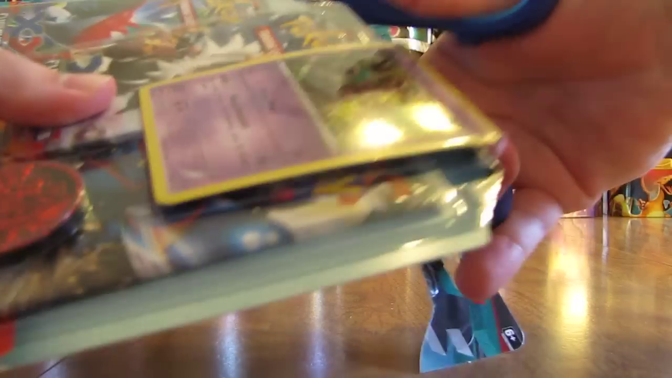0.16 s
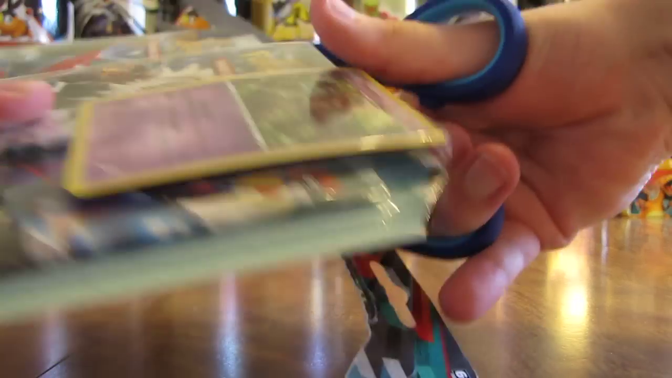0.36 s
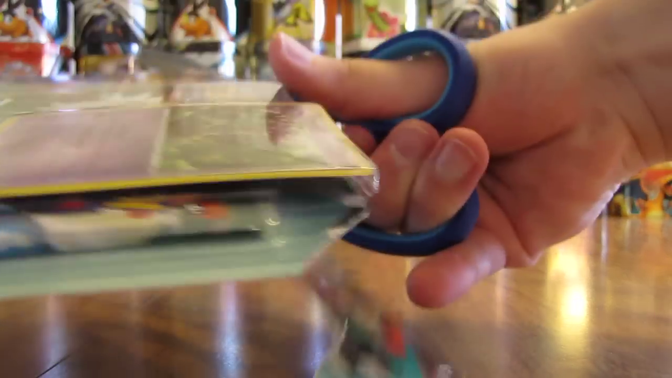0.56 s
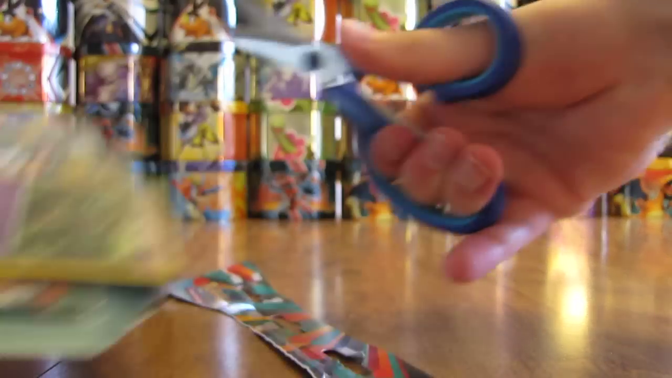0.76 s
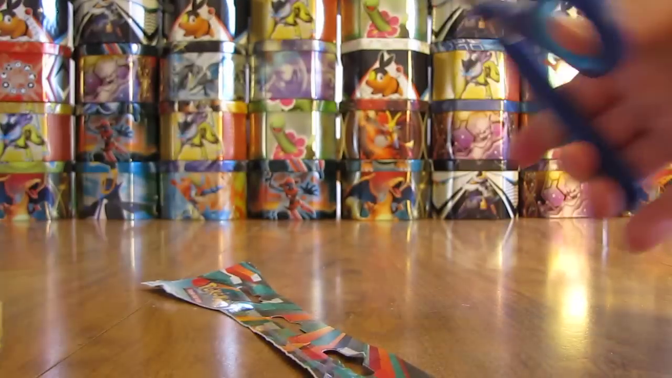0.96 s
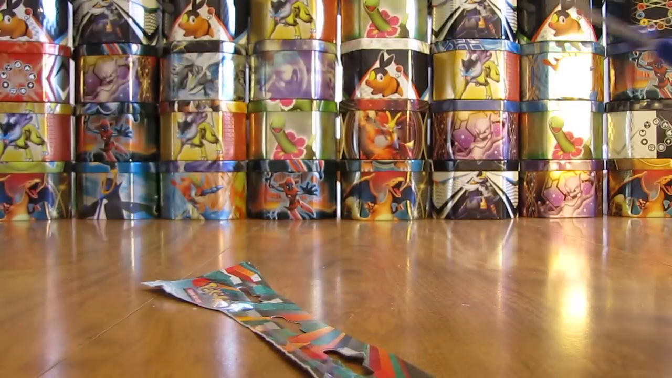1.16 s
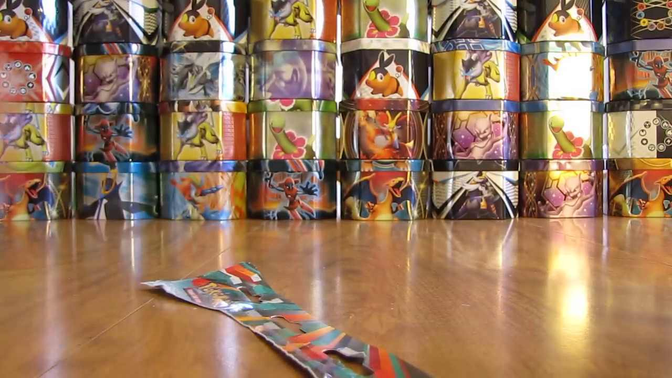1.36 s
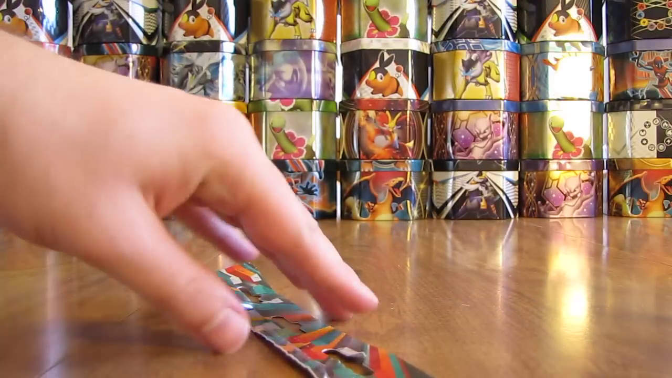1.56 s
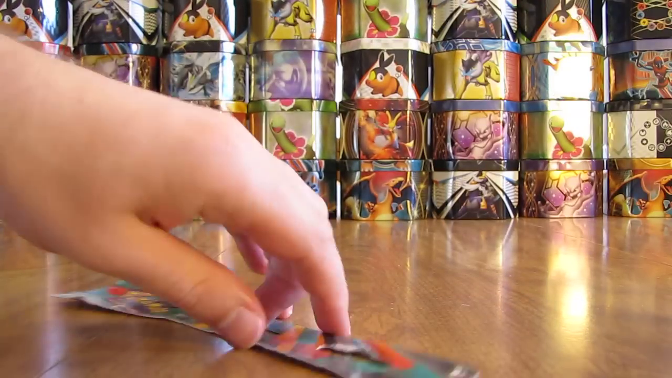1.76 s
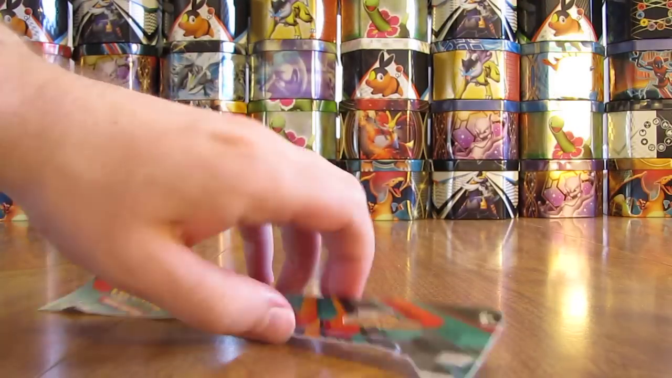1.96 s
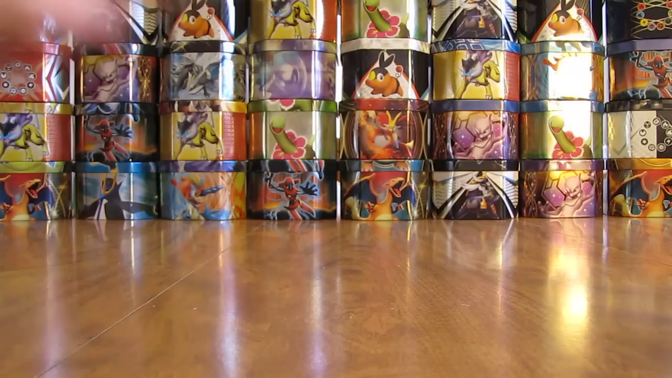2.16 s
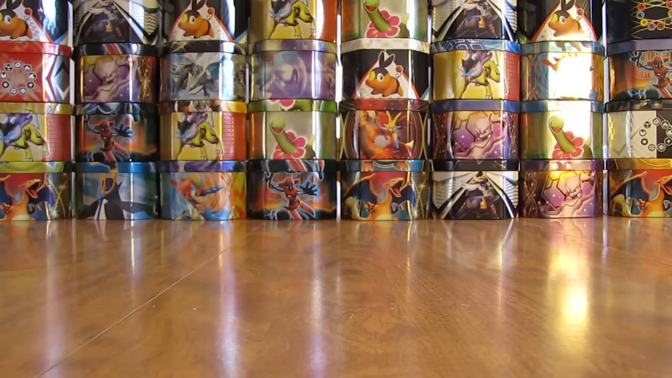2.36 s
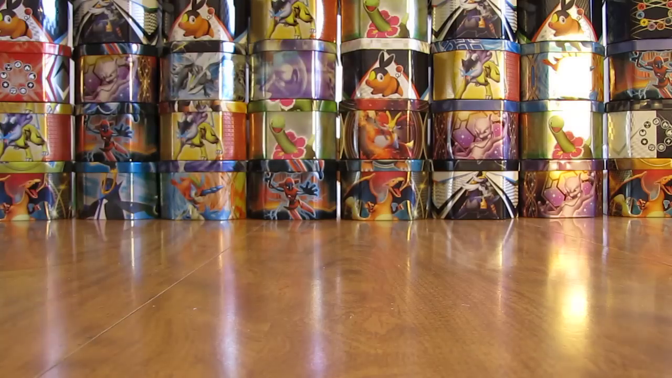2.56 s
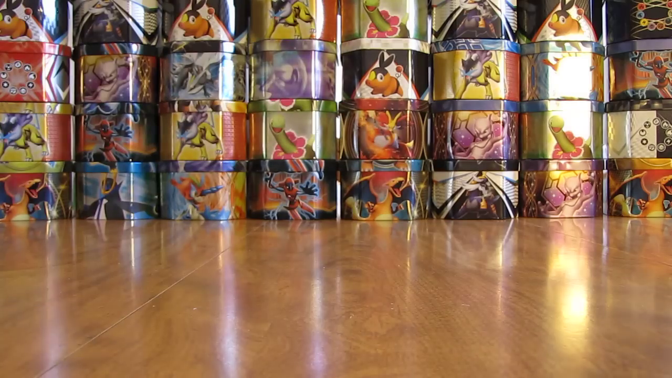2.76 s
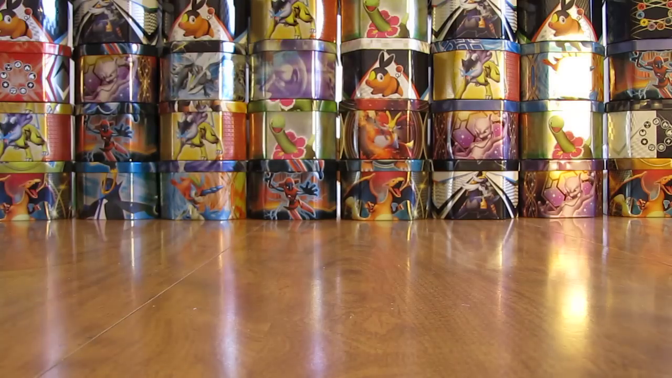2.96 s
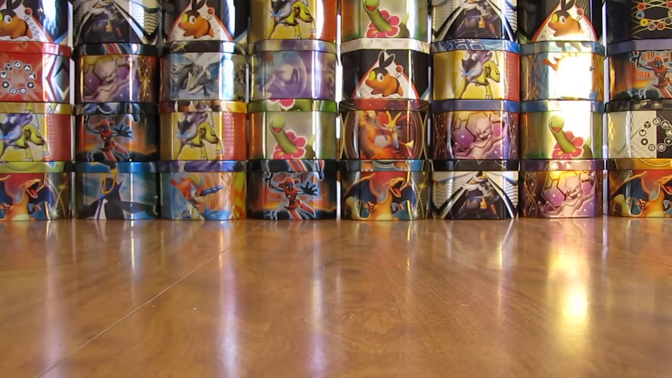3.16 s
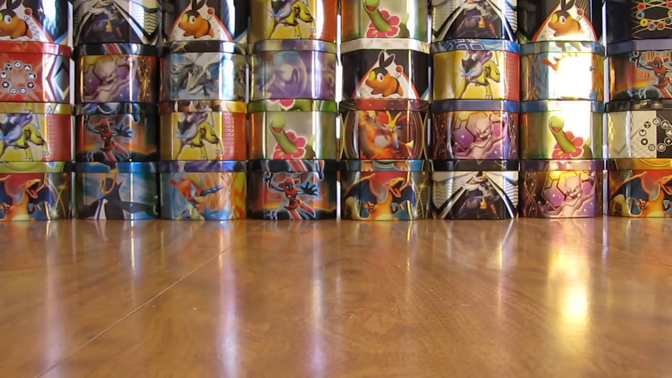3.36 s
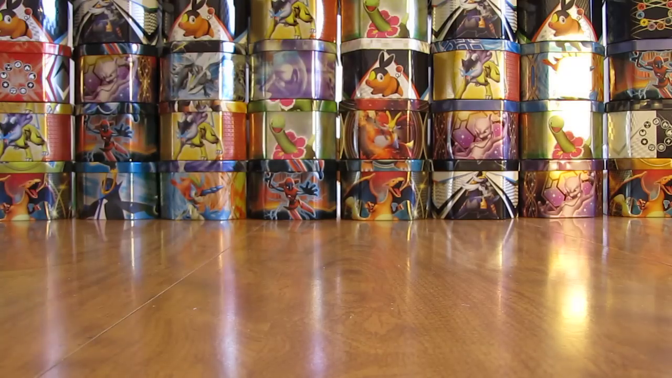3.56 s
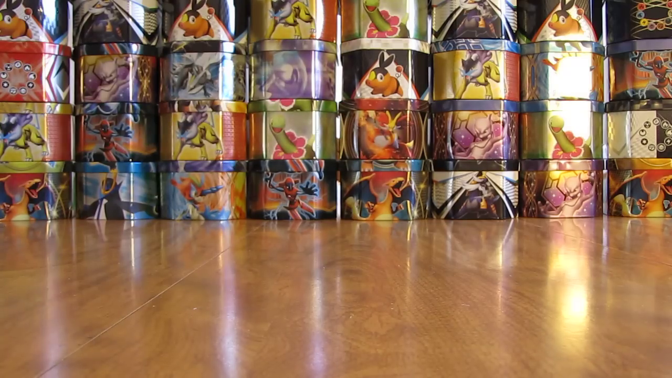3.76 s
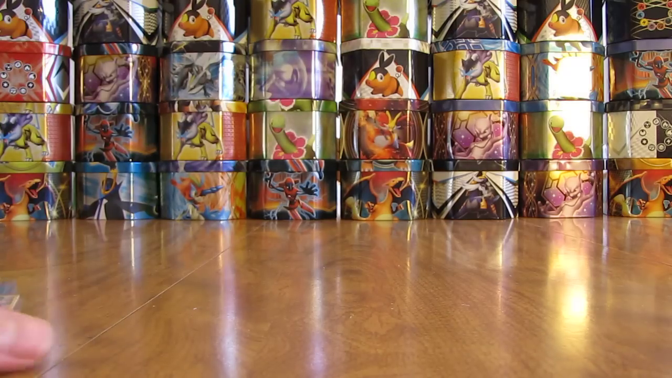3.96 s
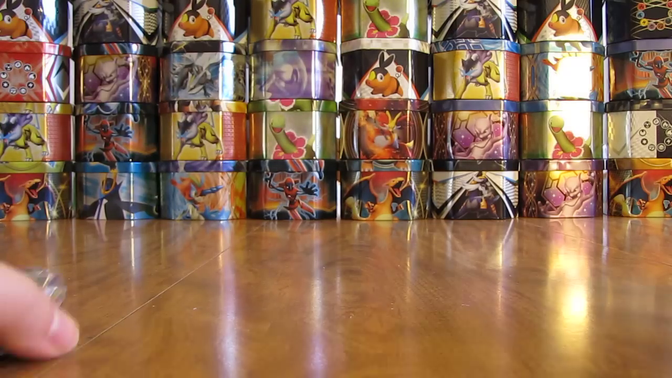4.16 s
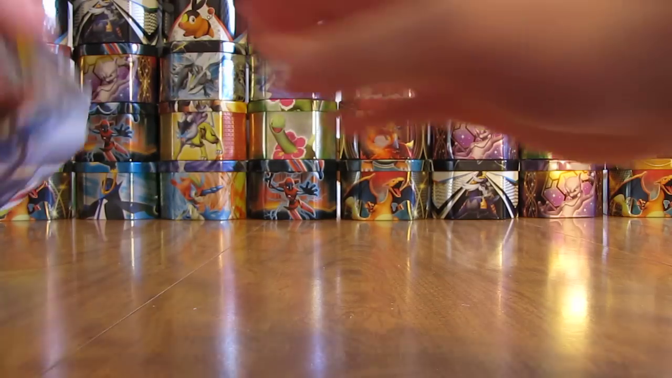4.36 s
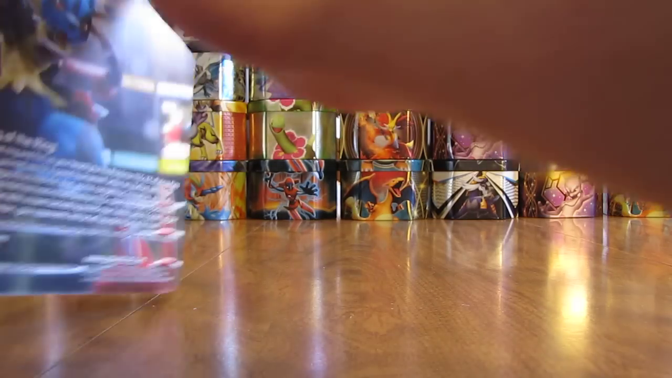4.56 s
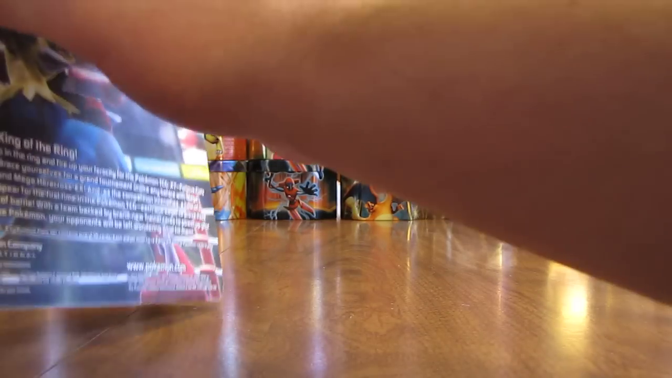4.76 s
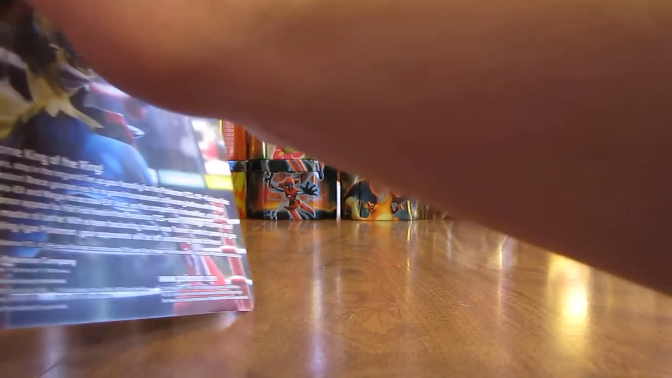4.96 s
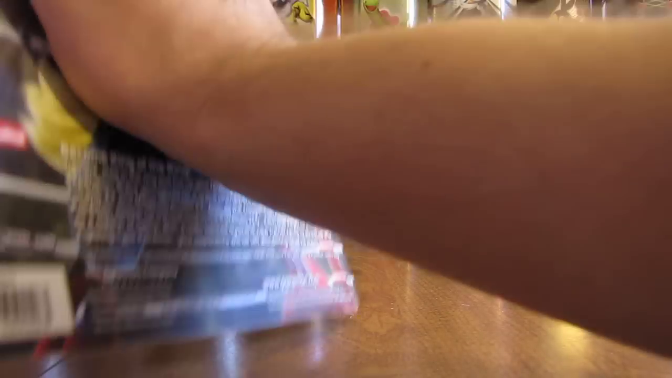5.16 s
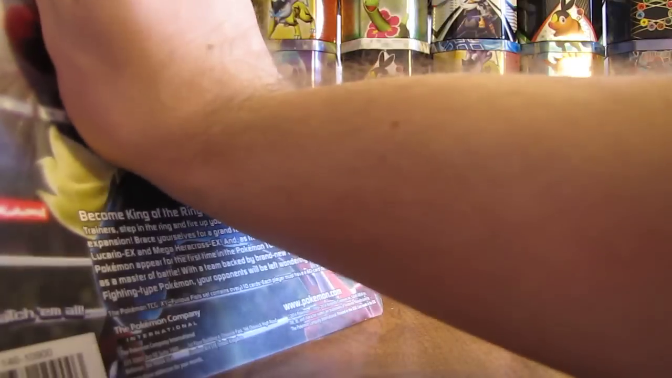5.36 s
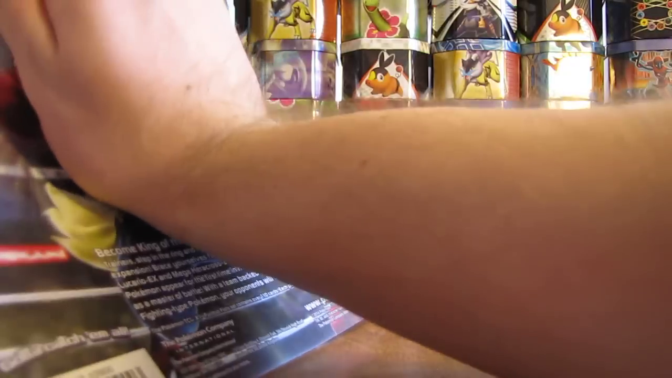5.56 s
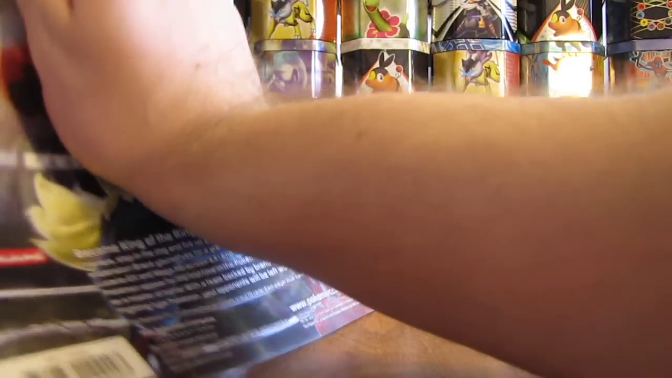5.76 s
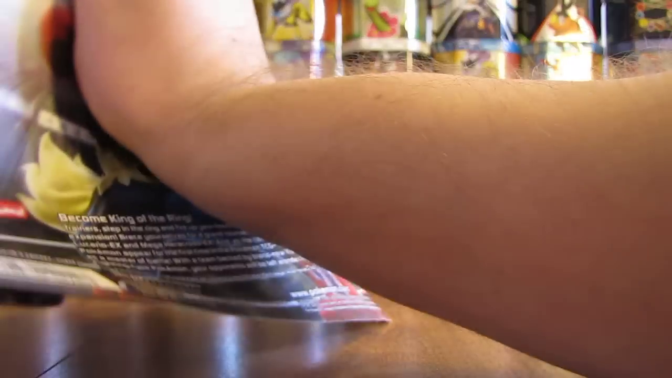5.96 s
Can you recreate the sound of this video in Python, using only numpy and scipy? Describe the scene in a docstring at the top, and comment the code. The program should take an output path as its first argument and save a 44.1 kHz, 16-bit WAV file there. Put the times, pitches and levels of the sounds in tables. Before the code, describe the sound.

A close, dry stereo perspective in a small furnished room, slightly stronger on the right, with constant faint hiss. From 0 to 0.35 s scissors cut stiff plastic and card: a tight flurry of bright snaps and short rasps, building to the loudest crunch near 0.3. Isolated hard cracks follow at about 0.5 and 0.63, then smaller clicks around 0.85 to 1.2 as the offcut drops and things touch the wooden table. A soft tap comes at 1.5, with barely audible sliding until 2. From 2 to 3.6 it is nearly quiet, just low handling rumble and tiny scuffs. At 3.7 to 3.8 the pack knocks and clacks; light rustling leads to a sharp crack near 4.85. From 5.05 creases snap and edges scrape in quick bursts, with a woody thump at 5.3, a strong pop at 5.5, and dense, bright crinkling and bumps through 6 s.

```python
"""A small furnished room, two close microphone ports: scissors cut stiff plastic and card over a wooden table.
The offcut drops and is slid away, then the pack is bent and pulled open.
Creases snap as click clusters, edges scrape in rushes of tiny slips; both ring the sheet near 1.5 kHz.
Hands rustle and rumble as filtered slips, blows are damped low sines, and a faint hiss is banded noise.
Feedback delays add the room."""
import sys
import numpy as np
from scipy import signal
from scipy.fft import rfft, irfft, next_fast_len
from scipy.io import wavfile

SR = 44100
rng = np.random.default_rng(int(sys.argv[2]) if len(sys.argv) > 2 else 0)


def generate_wav(sig):
    """Save sig (samples, or channels by samples) to the path in sys.argv[1] as 16-bit PCM at SR."""
    pcm = np.round(np.clip(np.atleast_2d(sig).T, -1, 1) * 32767).astype(np.int16)
    wavfile.write(sys.argv[1], SR, pcm)


N = 265482
LAID_DOWN_S = 1.19   # until here the pack is in the air, afterwards on the table


def from_db(db):
    """Decibels to an amplitude factor."""
    return 10 ** (np.asarray(db) / 20)


def rms_one(x):
    """Scale to an rms of 1."""
    return x / np.sqrt(np.mean(x ** 2) + 1e-20)


def band(x, low_hz, high_hz):
    """Keep the part between two frequencies."""
    return signal.sosfilt(signal.butter(2, [low_hz, high_hz], "band", fs=SR, output="sos"), x)


def add(out, start_s, sound):
    """Mix a sound in at its start time, cut off at the end of the scene."""
    at = round(start_s * SR)
    out[..., at:at + sound.shape[-1]] += sound[..., :N - at]


def drift(rate_hz):
    """Slow random wander with an rms of 1, computed at every 40th sample and interpolated."""
    r = np.exp(-80 * np.pi * rate_hz / SR)
    noise = rng.standard_normal(N // 40 + 2002)
    slow = signal.lfilter([1], [1, -2 * r, r * r], noise)[2000:]   # skip the filter's start-up
    return np.interp(np.arange(N) / 40, np.arange(len(slow)), rms_one(slow))


def slips(per_s, spread_db, size=N):
    """Tiny stick-slip clicks of very uneven size over a trace of noise; rms 1."""
    sizes = from_db(spread_db * np.minimum(rng.exponential(1, size), 4))
    sizes = sizes * rng.choice([-1, 1], size)
    happens = rng.random(size) < per_s / SR
    return rms_one(sizes * happens + 0.021 * rng.standard_normal(size))


def shaped(clicks, envelope):
    """Clicks under an envelope, carrying just the energy that the envelope gives."""
    force = clicks * envelope
    return force * np.sqrt(np.sum(envelope ** 2) / np.sum(force ** 2, axis=-1, keepdims=True))


def resonance(x, hz, width_hz):
    """Two-pole ring; white noise keeps its rms."""
    r = np.exp(-np.pi * width_hz / SR)
    ring = signal.lfilter([1, 0, -1], [1, -2 * r * np.cos(2 * np.pi * hz / SR), r * r], x)
    return ring * np.sqrt((1 - r * r) / 2)


# How the sheet is bent sets its ring: start_s [s], ring_hz [Hz], ring_db [dB over the sheet level]
BEND = [(0.0, 1920, 2), (0.08, 1410, 4), (0.28, 1380, 6), (0.308, 784, -5), (1.0, 1800, 1),
        (1.2, 1660, -3.5), (1.75, 800, 1), (2.7, 1580, -21), (3.3, 1460, -10), (3.7, 1700, 3.5),
        (3.8, 1440, 7.5), (4.22, 1040, 14), (4.82, 1410, 8.5), (5.05, 1780, 22.5), (5.27, 1450, 7.5),
        (5.48, 1420, 4), (5.7, 1505, 7.5), (5.85, 1300, 8), (6.02, 1700, -3)]


def bend(s):
    """Ring pitch and ring level at a moment, gliding between the bends."""
    times, hz, db = np.transpose(BEND)
    return np.interp(s, times, hz), np.interp(s, times, db)


# The sheet's thud, sheet, crack and treble regions: low_hz [Hz], high_hz [Hz]
REGIONS_HZ = [(200, 600), (600, 2500), (2500, 6000), (6000, 13500)]
# Share of each region that only the right port hears, as a wide sheet clicks in many places: share [0-1]
RIGHT_ONLY_SHARE = [.05, .2, .6, .8]
# The housing shades the right port, most of all in the treble: level_db [dB], one per region
RIGHT_SHADE_DB = [-3, -2.5, -4.5, -5]
# Wooden table modes: pitch_hz [Hz], width_hz [Hz], level_db [dB, before each player's own trim]
TABLE_MODES = [(122, 6.5, 6), (181.3, 48, -8), (357, 165, -9), (502, 17, -14), (782, 530, -8)]
LOW_BED_DB = -8.5   # the plain thud region under its table modes
# the moulded bubble rings a little differently each time; scatter is the spread of log pitch
BLISTER_HZ, BLISTER_SCATTER, BLISTER_WIDTH_HZ, BLISTER_DB = 4927, 0.18, 510, -2


def sheet(force, levels_db, ring_hz, ring_db, width_hz):
    """Two slip streams drive four broad regions: table modes, bent-panel ring and blister colour the first three."""
    regions = []
    for low_hz, high_hz in REGIONS_HZ:
        keep_rms = np.sqrt(SR / 2 / (high_hz - low_hz))
        regions.append(band(force, low_hz, high_hz) * keep_rms)
    modes = sum(from_db(db - 2.5 + rng.normal(0, 3.5)) * resonance(force, hz, width)
                for hz, width, db in TABLE_MODES[2:])
    regions[0] = from_db(LOW_BED_DB) * regions[0] + modes
    regions[1] = regions[1] + from_db(ring_db) * resonance(force, ring_hz, width_hz)
    blister_hz = BLISTER_HZ * np.exp(BLISTER_SCATTER * rng.standard_normal())
    regions[2] = regions[2] + from_db(BLISTER_DB) * resonance(force, blister_hz, BLISTER_WIDTH_HZ)
    out = 0
    for k, (shared, right_only) in enumerate(regions):
        share = np.clip(RIGHT_ONLY_SHARE[k], 0, 1)
        right = np.sqrt(1 - share) * shared + np.sqrt(share) * right_only
        right = from_db(RIGHT_SHADE_DB[k]) * right
        # alternate signs let neighbouring regions join without a notch
        out = out + (-1) ** k * from_db(levels_db[k]) * np.array([shared, right])
    return out


# Scuffs, scrapes and tears: start_s [s], length_ms [ms, plus a tenth], rasp_db [dB, 2.5-6 kHz],
# sheet_db [dB over rasp], treble_db [dB over rasp], growth_db [dB over the length]
SCRAPES = [(0, 35, -28.5, -9.5, -7, -2), (0.074, 49, -47.5, -6, -22, -16),
           (0.163, 45, -34.5, -11.5, -7, -1), (0.245, 39, -34, -12.5, -3, -22),
           (0.277, 18.2, -20, -14, -13, 13), (0.299, 74, -54, 9.5, -12, -7), (0.997, 76, -43, 5, -3, -6.5),
           (1.174, 30, -48, 2.5, -11, -4), (1.635, 54, -63, -5.5, 1, -12), (1.715, 42, -60, -4, 4.5, 6),
           (1.798, 85, -65.5, -6.5, 2.5, 21), (1.962, 57, -64, -25, -1, 7),
           (2.661, 63, -72.5, 15.5, -12, -1), (2.75, 97, -63.5, 6.5, -16, -7),
           (2.889, 100, -76.5, 14, -16, -20), (3.05, 46, -63, 7.5, -17, 2), (3.081, 150, -56, -7, -25, -9),
           (3.236, 33, -57.5, 2, -6, -2), (3.274, 96, -65, 11, -6, -14), (3.701, 81, -40, 3.5, -1.5, -12.5),
           (3.788, 61, -38, -5.5, -13, -26), (3.892, 44, -62.5, 14.5, 4, -8), (4.031, 61, -55, -9, 0, 8),
           (4.21, 160, -47.5, -25, 3, -8), (4.439, 63, -47.5, -25, -6.5, 2),
           (4.818, 20, -37, -14.5, -30, 13), (4.903, 48, -47, -18, -5, 2),
           (5.048, 28.7, -32.5, -16, -18, 9), (5.158, 94, -42.5, -23, -5, -9),
           (5.244, 49, -38.5, -13.5, -18, -8), (5.404, 230, -54.5, -10.5, -2, -47.5),
           (5.442, 32.5, -27, -13.5, 0, 1), (5.474, 28.5, -26.5, -17, -8, 10), (5.64, 53, -51, -2, 13, -8),
           (5.703, 105.7, -26, -9, 3.5, -9.5), (5.841, 81, -33, -34, 1.5, -3.5),
           (5.91, 101, -31.5, -14.5, 1, -6)]
# Thud of a scrape: level_db [dB over the sheet level], in the air then on the table
SCRAPE_THUD_DB = [-26.5, 6]


def scrapes():
    """An edge drags or tears: dense slips in clumps under a stroke that grows or sags."""
    out, t = np.zeros((2, N)), np.arange(SR // 4) / SR
    clumps = from_db(1.8 * drift(90))
    for start_s, length_ms, rasp_db, sheet_db, treble_db, growth_db in SCRAPES:
        along = 1000 * t / length_ms
        fade = np.clip(np.minimum(along / 0.088, (1.1 - along) / 0.24), 0, 1)
        stroke = fade * from_db(growth_db * np.minimum(along - .5, 1))
        clumps_here = np.roll(clumps, -round(start_s * SR))[:len(t)]
        grains = slips(6000, 4.1, size=(2, len(t))) * clumps_here
        force = shaped(grains, stroke)
        thud_db = sheet_db + SCRAPE_THUD_DB[start_s > LAID_DOWN_S]
        levels_db = rasp_db + np.array([thud_db, sheet_db, 0, treble_db])
        add(out, start_s, sheet(force, levels_db, *bend(start_s), width_hz=200))
    return out


# Hands moving on pack and table, gliding between points: start_s [s], rustle_db [dB],
# fine_db [dB over rustle]
HANDLING = [(0.0, -35, 4), (0.18, -55.5, 6.5), (0.35, -71, 6.5), (0.91, -63.5, 15), (1.05, -53.5, -12),
            (1.22, -84, -5), (1.46, -75, 3), (1.74, -71.5, 10), (2.13, -72.5, 5), (2.5, -68, 2),
            (2.8, -65, 1), (3.2, -60.5, 4.5), (3.4, -64, -0.5), (3.74, -68, 1), (3.89, -54.5, 3.5),
            (4.38, -60.5, 1.5), (4.69, -52, -10), (5.0, -53, 4), (5.6, -53.5, 11.5), (5.75, -40.5, 15.5),
            (6.02, -41, -5)]
# Resonances of the card: pitch_hz [Hz], width_hz [Hz], level_db [dB, before wander and the joint card level]
CARD_MODES = [(456, 67, 3), (1466, 1300, 1.5), (1770, 250, -9), (3380, 1500, 1)]
CARD_DB = 1   # the card's ring over the plain rustle
# the rumble takes this share of the rustle's swing around its mean
RUMBLE_DB, RUMBLE_FOLLOWS, RUSTLE_MEAN_DB = -55, 0.52, -59.5


def handling():
    """Low lumpy rumble of hands and table, and a bed of small crinkles coloured by the card."""
    times, *columns = np.transpose(HANDLING)
    rustle_db, fine_db = [np.interp(np.arange(N) / SR, times, column) for column in columns]
    rumble_gain = from_db(RUMBLE_DB + RUMBLE_FOLLOWS * (rustle_db - RUSTLE_MEAN_DB))
    rustle_gain, fine_gain = from_db(rustle_db), from_db(rustle_db + fine_db)

    knocks = slips(1200, 3.2) * from_db(3.7 * drift(1.7))
    modes = sum(from_db(db) * resonance(knocks, hz, width) for hz, width, db in TABLE_MODES[:3])
    rumble = rms_one(band(knocks, 17, 346)) + 0.41 * rms_one(modes)

    shared, right_only = slips(3500, 0.3, size=(2, N)) * from_db(1.05 * drift(22))
    card = sum(from_db(db + 3 * drift(8)) * resonance(shared, hz, width)
               for hz, width, db in CARD_MODES)
    rustle = rms_one(band(shared, 570, 2180)) + from_db(CARD_DB) * rms_one(card)
    fine_rustle = band(np.array([shared, .5 * shared + 0.58 * right_only]), 3500, 9700)
    return rumble_gain * rumble + rustle_gain * rustle - fine_gain * rms_one(fine_rustle)


# Colour of the hiss: pitch_hz [Hz], density_db [dB per Hz, relative]
HISS = [(15, -30), (25, 14), (85, 5), (397, -6.5), (535, -12.5), (1020, -3), (2190, -18.5), (3290, -16.5),
        (12400, -27), (15000, -50), (16300, -61)]
# Left-right likeness of the hiss: pitch_hz [Hz], likeness [0-1]
HISS_ALIKE = [(60, 0.19), (380, 0.049), (2380, 0.12), (15000, 0.63)]
HISS_DB = -56   # rms of the whole hiss


def hiss():
    """Steady room tone and preamp noise: half-octave noise bands, each with its own stereo likeness."""
    out, edges_hz = 0, 25 * 2 ** np.arange(0, 9.6, .5)
    white = rng.standard_normal((2, 2, N))   # neighbouring bands use separate noise
    for k, (low_hz, high_hz) in enumerate(zip(edges_hz, edges_hz[1:])):
        mid, side = band(white[k % 2], low_hz, high_hz)
        log_centre = np.log(low_hz * high_hz) / 2
        db, alike = [np.interp(log_centre, np.log(hz), values)
                     for hz, values in (np.transpose(HISS), np.transpose(HISS_ALIKE))]
        alike = np.clip(alike, 0, 1)
        stereo = np.sqrt(1 + alike) * mid + np.sqrt(1 - alike) * side * [[1], [-1]]
        out = out + from_db(db) * stereo
    return from_db(HISS_DB) * rms_one(out)


# Creases, blades and taps: start_s [s, 1 ms before the big click], crack_db [dB, 2.5-6 kHz, before trim],
# sheet_db [dB over crack], treble_db [dB over crack], ring_hz [Hz]
SNAPS = [(0.011, -18.5, -88.5, -33, 2060), (0.0254, -38.5, -4, 0, 1230), (0.084, -39, 3, -16, 1480),
         (0.1224, -32.5, -23, -12, 1030), (0.171, -22.5, -9, -18, 1620), (0.1942, -19, -18.5, -12, 1690),
         (0.2131, -18, -13, -8, 1570), (0.232, -16.5, -20, -17, 2340), (0.2431, -14.5, -22, -12, 2580),
         (0.248, -27, -23.5, -11.5, 1400), (0.253, -29, -24.5, -18, 1680), (0.2779, -10.5, -31, -12, 1400),
         (0.2812, -10.5, -19, -10, 1400), (0.2958, -7.5, -4, -13, 1200), (0.321, -35, -5, -10, 2500),
         (0.3455, -32.5, 4.5, -45, 820), (0.5138, -7, -7, -9, 1110), (0.5278, -37, 14, -27, 2300),
         (0.603, -47, 20.5, 6, 2430), (0.629, -9, -2.5, -7, 1640), (0.839, -28.5, 10.5, -9, 1064),
         (0.896, -37.5, 0, -2, 1960), (0.983, -34.5, -17, -13, 1730), (1.0106, -24, -25, -29, 1820),
         (1.0649, -17.5, -3.5, 5, 2020), (1.112, -49.5, 16, -17, 1880), (1.173, -33, 2, -23, 1620),
         (1.2038, -38, 4.5, -26, 950), (1.434, -49.5, -25, -15, 842), (1.5251, -37, 4, -11, 1100),
         (2.5725, -51.5, 14.5, -24, 1350), (3.269, -51, 18, -8, 990), (3.7003, -17.5, -2.5, -3.5, 1660),
         (3.7375, -29.5, 10, -16, 1140), (3.7832, -17, -2.5, -11.5, 1340), (3.8874, -44, 13, -20, 1290),
         (4.1249, -41, 10.5, 10.5, 1290), (4.2639, -42.5, 2, -21, 980), (4.4786, -41, -7, -28.5, 1050),
         (4.5482, -48, 13.5, -9, 1080), (4.681, -32, -4.5, -29, 950), (4.6941, -23.5, 2, -18, 1560),
         (4.8361, -12.5, -12.5, -13, 1614), (5.022, -44, -2.5, -6, 1180), (5.0385, -32.5, -11.5, -4, 1560),
         (5.0845, -24.5, -33, -16, 1820), (5.279, -28.5, 13, -6, 740), (5.2861, -16, -2, -6.5, 1500),
         (5.29, -16.5, 7, -4, 1520), (5.455, -20.5, -1.5, -2, 1550), (5.4969, -10.5, -8, -9.5, 1890),
         (5.5554, -31, -6, 6, 1500), (5.5937, -53, 6, 18, 1530), (5.6869, -39.5, 10.5, 2, 1630),
         (5.7084, -20, -10, 4, 1360), (5.782, -24, -12, -3, 1710), (5.8451, -25.5, 1.5, -4.5, 780),
         (5.852, -30, 7.5, -8, 1390), (5.9349, -22, -22, -4, 1780), (5.9596, -21, -2, -4, 1400),
         (6.0134, -29.5, 4.5, 1, 1120)]
# How a click cluster spreads over thud, sheet, crack and treble: trim_db [dB]
SNAP_TRIM_DB = [13.23, 4.35, 7.02, 11.9]
# Thud of a snap: level_db [dB over the sheet level], in the air then on the table
SNAP_THUD_DB = [-18.5, 0.5]
SNAP_RING_DB = 1.5   # a snap rings the sheet this much more than a scrape
LEAD_S = .002   # from the first small clicks to the big one
# decay time at 0 dB treble; bright snaps die sooner: dB of time per dB of treble
SNAP_DYING_MS, BRIGHT_SHORTENS = 2.46, 0.18


def snaps():
    """A crease lets go in a cluster of clicks around one big click, thinning out within milliseconds."""
    out, t = np.zeros((2, N)), np.arange(SR // 10) / SR
    for start_s, crack_db, sheet_db, treble_db, ring_hz in SNAPS:
        decay = np.exp(-1000 * t / SNAP_DYING_MS * from_db(BRIGHT_SHORTENS * treble_db))
        swell = 1 - np.exp(-t / 0.002)
        force = shaped(slips(12000, 3.3, size=(2, len(t))), decay * swell)
        force[:, round(LEAD_S * SR)] += 3.5   # the big click
        thud_db = sheet_db + SNAP_THUD_DB[start_s > LAID_DOWN_S]
        levels_db = crack_db - 6 + np.add([thud_db, sheet_db, 0, treble_db], SNAP_TRIM_DB)
        ring_db = SNAP_RING_DB + bend(start_s)[1]
        add(out, start_s - LEAD_S / 2, sheet(force, levels_db, ring_hz, ring_db, width_hz=130))
    return out


# Blows that shake the table and the microphone on it: start_s [s], level_db [dB, before an 8 dB lift],
# boom_hz [Hz]
THUMPS = [(0.294, -31.5, 89), (0.523, -31.5, 62.4), (0.839, -28, 264), (1.205, -31.5, 194),
          (1.525, -42, 121), (2.57, -46, 330), (2.889, -40.5, 181), (3.06, -46, 196), (3.705, -28, 190),
          (3.739, -25, 194), (5.277, -32, 229), (5.287, -20.5, 121), (5.545, -28.5, 340), (5.594, -31, 305),
          (5.663, -39, 325), (5.687, -30, 330), (5.851, -26, 140), (5.968, -30, 223), (6.011, -20, 284)]


def thumps():
    """A soft push: a couple of low cycles, quickly damped."""
    out, t = np.zeros(N), np.arange(SR // 8) / SR
    for start_s, level_db, boom_hz in THUMPS:
        boom = np.sin(2 * np.pi * boom_hz * t) * np.exp(-t * boom_hz * 1.94)
        add(out, start_s, from_db(level_db + 8.0) * boom)
    return out


ROOM_T60_S, ROOM_DB = 0.22, -18.5   # decay time before wall dulling, send level
WALL_CUT_HZ = 6000   # lowpass on every round


def room(x):
    """Eighteen feedback delays a side, each duller on every round, solved in the frequency domain."""
    size = next_fast_len(N + SR // 2)
    w = 2 * np.pi * np.arange(size // 2 + 1) / size   # radians per sample
    dull = 1 / (1 + 1j * w * SR / (2 * np.pi * WALL_CUT_HZ))
    spectrum, out = rfft(x, size), []
    for lags in (rng.uniform(.009, .035, (2, 18)) * SR).astype(int):
        loops = [from_db(-60 * lag / SR / ROOM_T60_S) * dull * np.exp(-1j * w * lag) for lag in lags]
        # g / (1 - g) sums all the rounds of one loop
        echoes = sum((-1) ** k * g / (1 - g) for k, g in enumerate(loops))
        out.append(irfft(spectrum * echoes, size)[:N])
    return np.array(out)


# Where the hands work: start_s [s], pan_db [dB, left minus right]
PLACE = [(0.0, -2.5), (0.92, -2), (3.28, -2), (3.34, -3.5), (6.02, -1.5)]
RIGHT_LAG_S = 7e-5   # the pack sits left of the ports: its sound reaches the right one later


def scene():
    """Pan and delay the pack's sounds, then add the room, the thumps and the hiss."""
    t = np.arange(N)
    pan_db = np.interp(t / SR, *np.transpose(PLACE))
    pack = (snaps() + scrapes() + handling()) * from_db([pan_db / 2, -pan_db / 2])
    direct = np.array([pack[0], np.interp(t - RIGHT_LAG_S * SR, t, pack[1])])
    left, right = room(pack.mean(0))
    apart = band(left - right, 906, 16000) / 2   # close ports hear the same low reverberation
    echoes = (left + right) / 2 + apart * [[1], [-1]]
    return direct + from_db(ROOM_DB) * echoes + thumps() + hiss()


CUTOFF_HZ = 16400   # 40 dB down from here up


def record(dry):
    """Peaks beyond full scale clip, then a steep lowpass cuts the top."""
    clipped = np.clip(dry, -1, 1)
    return signal.sosfilt(signal.cheby2(20, 40, CUTOFF_HZ, fs=SR, output="sos"), clipped)


dry = scene()
out = record(dry)
generate_wav(out)
```